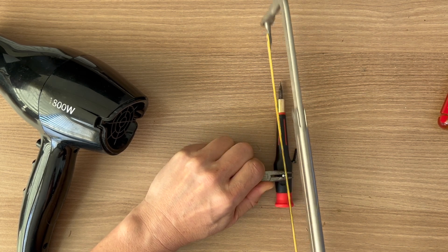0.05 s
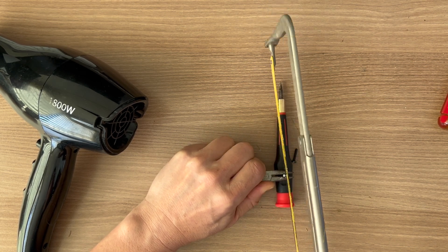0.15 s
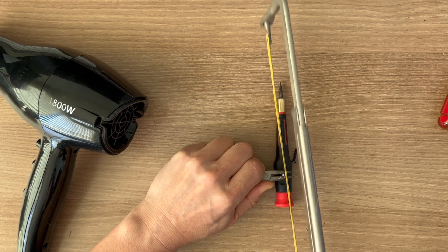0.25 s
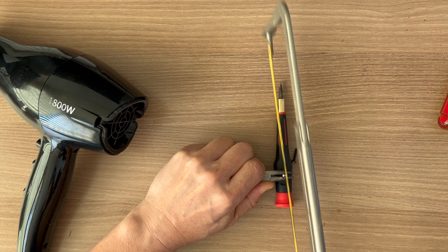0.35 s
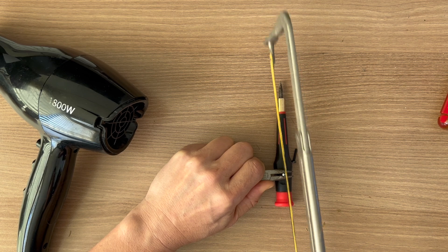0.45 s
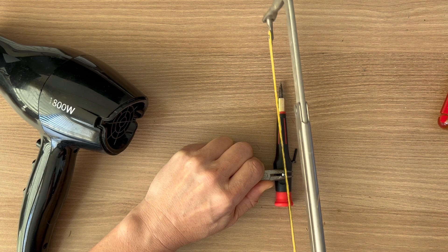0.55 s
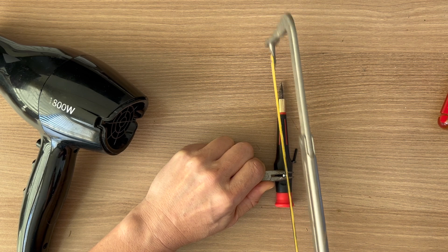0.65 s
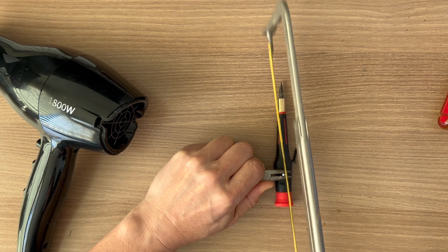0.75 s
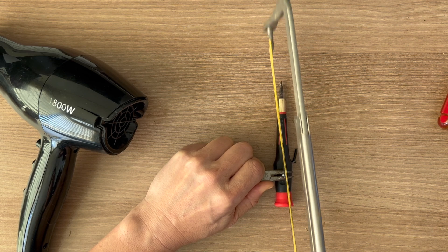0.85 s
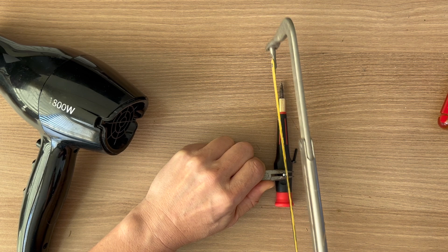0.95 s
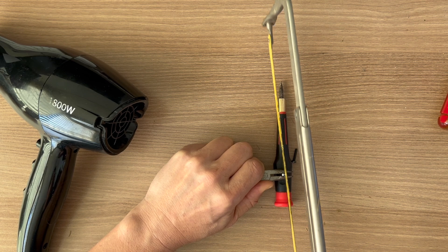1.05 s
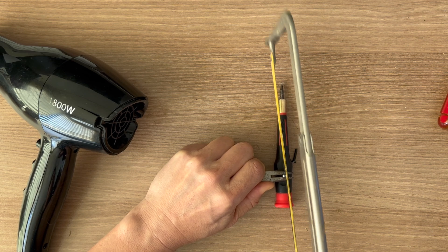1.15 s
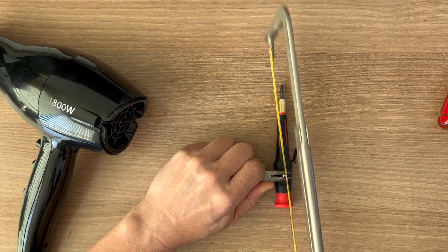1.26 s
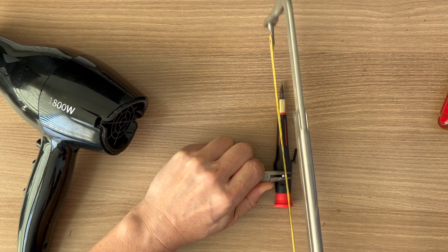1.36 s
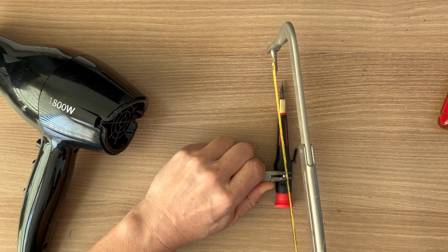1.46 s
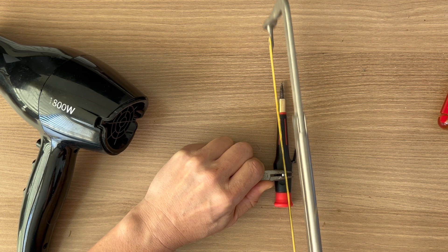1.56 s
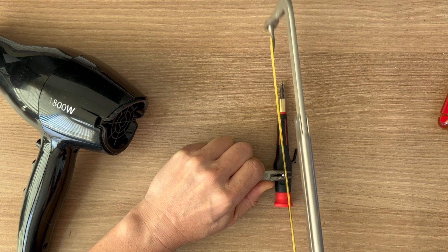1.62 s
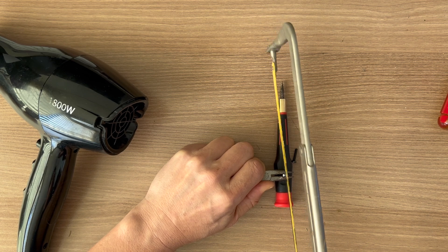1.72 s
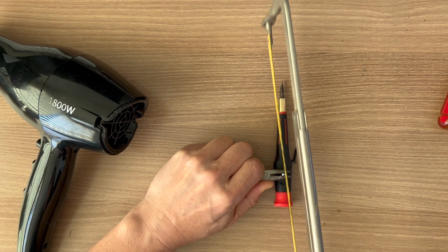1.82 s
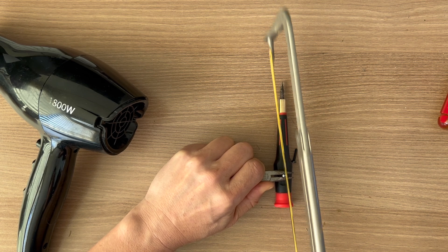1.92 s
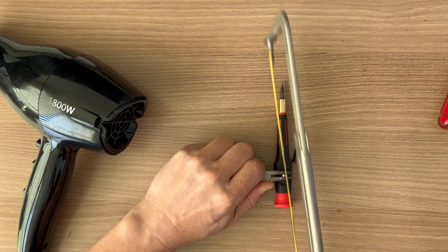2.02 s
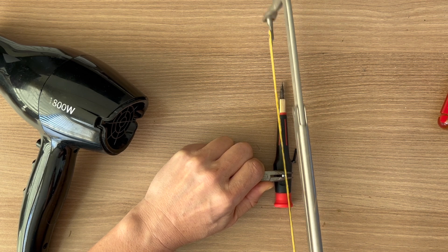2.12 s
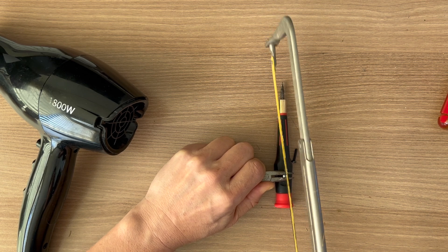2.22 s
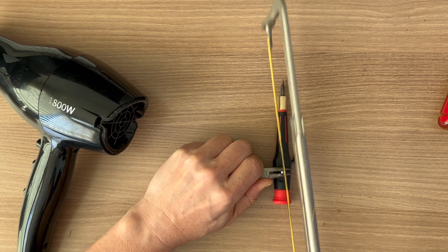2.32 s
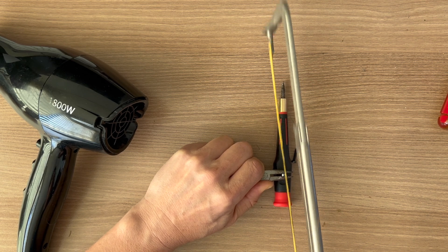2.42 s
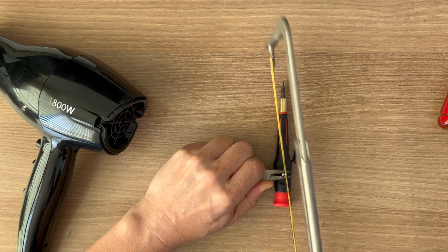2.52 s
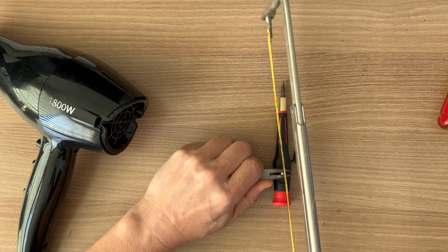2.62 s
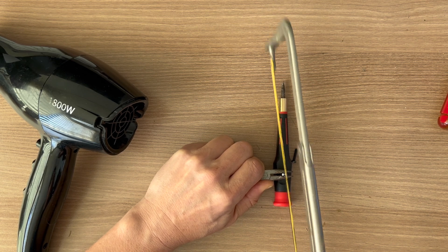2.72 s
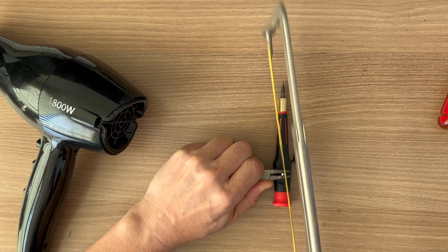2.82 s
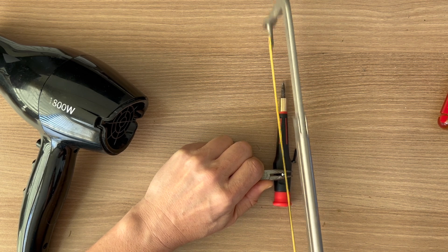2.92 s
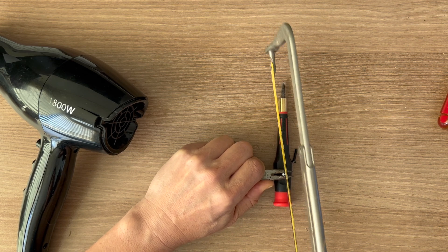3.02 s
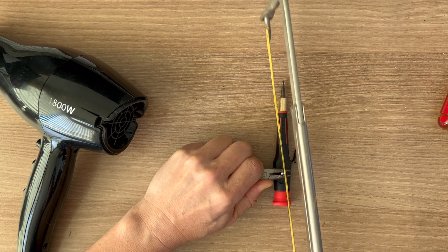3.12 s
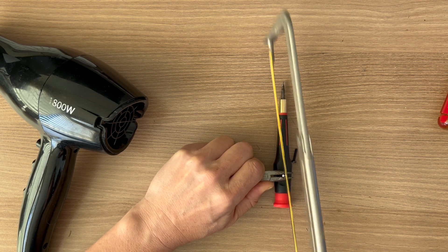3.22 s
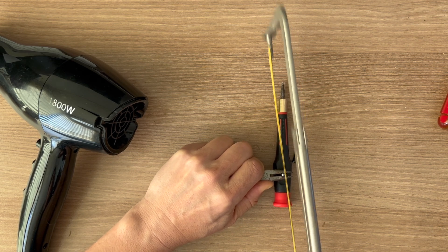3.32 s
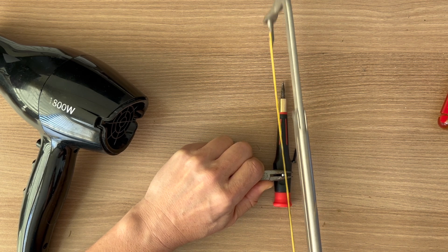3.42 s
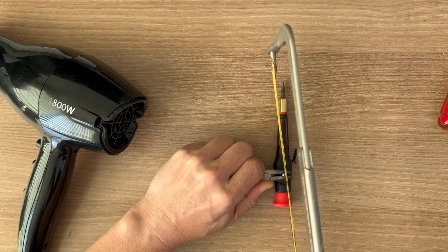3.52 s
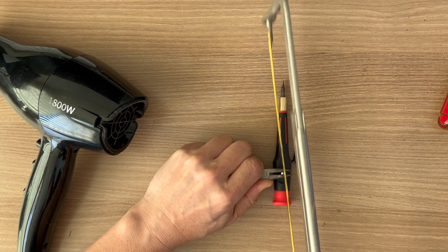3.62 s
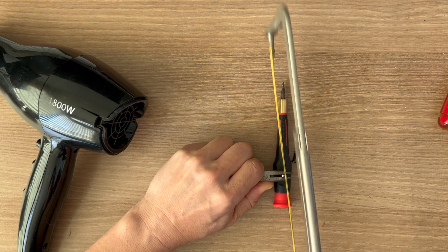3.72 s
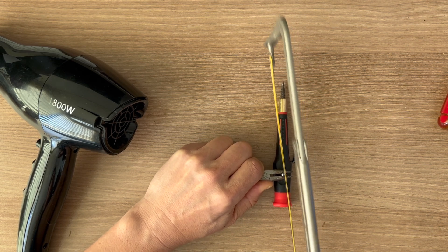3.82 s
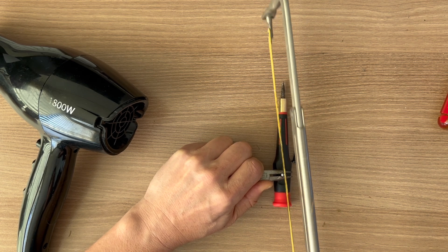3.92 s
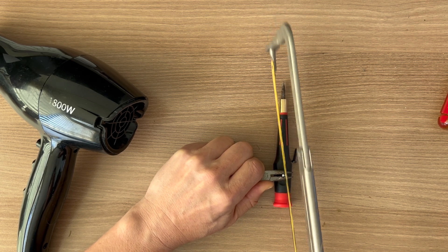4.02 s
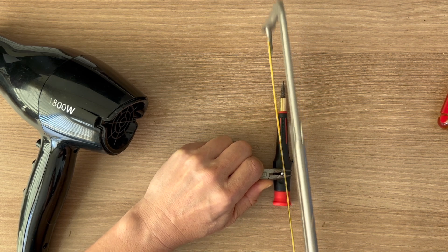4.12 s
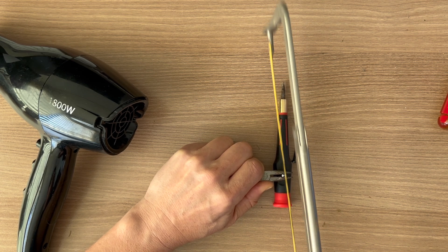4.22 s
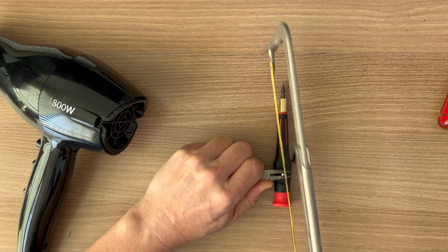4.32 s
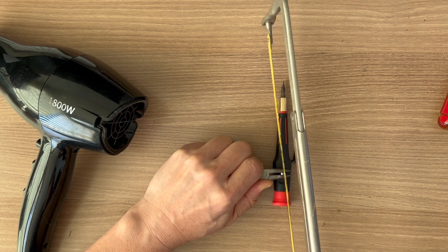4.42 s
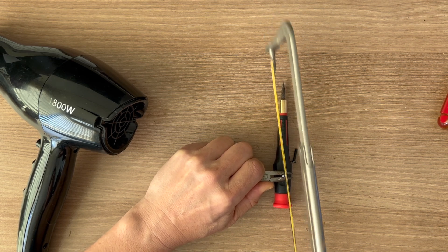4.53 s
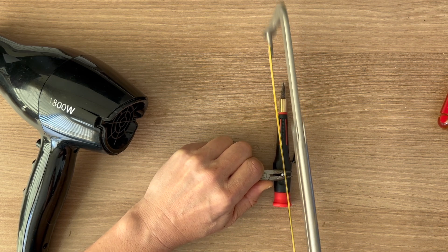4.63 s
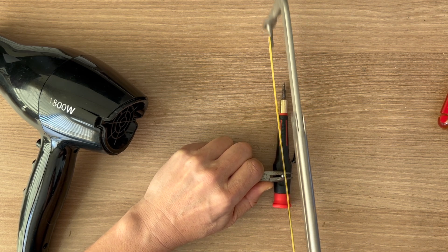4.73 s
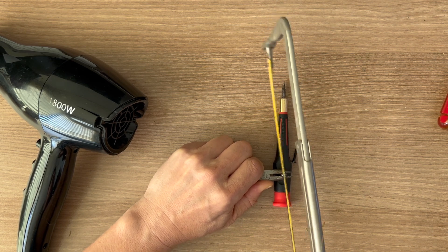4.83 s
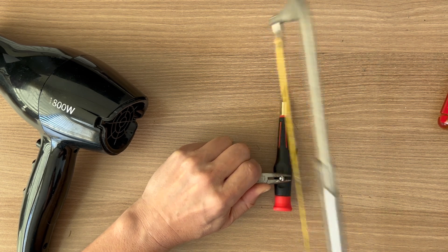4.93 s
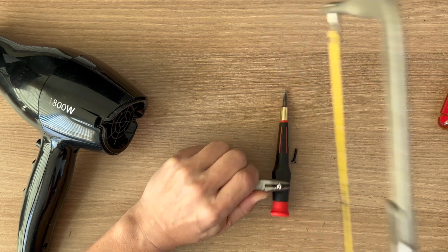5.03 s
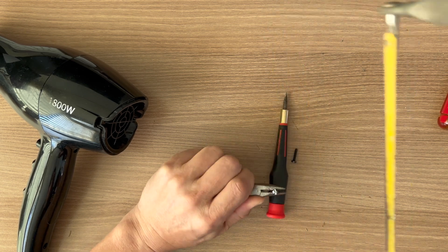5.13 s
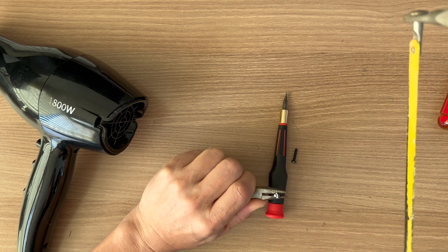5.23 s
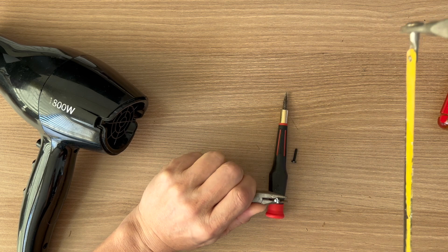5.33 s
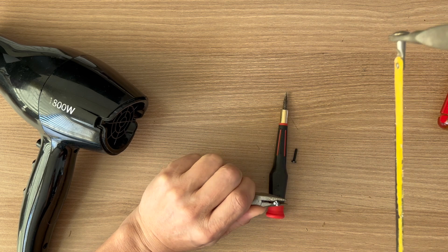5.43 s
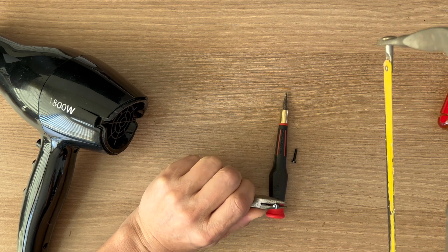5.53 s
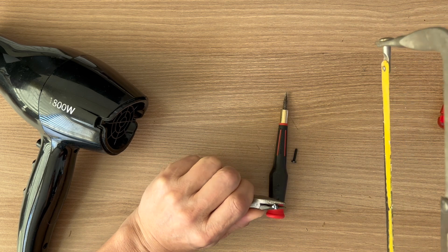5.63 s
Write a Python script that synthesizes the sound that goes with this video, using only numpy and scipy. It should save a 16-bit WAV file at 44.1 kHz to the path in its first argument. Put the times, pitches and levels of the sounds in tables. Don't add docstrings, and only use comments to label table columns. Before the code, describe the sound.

Sawing is already under way: short push and pull scrapes alternate rapidly, bright and metallic, with the thin frame resonating and the wooden bench rumbling underneath. Some teeth catch with sharp ticks. After nearly five seconds the strokes stop, the saw leaves the slot, and one bright wooden knock with duller rebounds ends the action. Then near silence with a barely audible distant whistle. Close stereo pickup, small dry room.

```python
import sys
import numpy as np
from scipy import signal
from scipy.fft import rfft, irfft, next_fast_len
from scipy.io import wavfile
from scipy.ndimage import uniform_filter1d

SR = 44100
rng = np.random.default_rng(int(sys.argv[2]) if len(sys.argv) > 2 else 0)


def ratio(d):
    e = np.asarray(d, float) / 20
    return 10 ** e


def master_out(mix):
    frames = np.transpose(np.atleast_2d(mix))
    ceiling = np.clip(frames, -1, 1)
    pcm = np.round(ceiling * 32767).astype(np.int16)
    wavfile.write(sys.argv[1], SR, pcm)


N = 249606
TIME = np.arange(N) / SR
SIZE = next_fast_len(N + SR)
HZ = np.fft.rfftfreq(SIZE, 1 / SR)

# (time [s], length [s], blade pressure [dB], lean on the bench [dB])
PULL_STROKES = [(0.06, 0.087, -39.5, 8), (0.322, 0.087, -37.5, 0), (0.591, 0.074, -36.5, 1.5),
                (0.845, 0.081, -39.5, 1), (1.101, 0.078, -37.5, -0.5), (1.362, 0.077, -35, 3.5),
                (1.623, 0.078, -33.5, -0.5), (1.878, 0.083, -36.5, 3), (2.132, 0.092, -38.5, 2.5),
                (2.397, 0.086, -36.5, 3.5), (2.656, 0.079, -34, -2.5), (2.915, 0.086, -35.5, 2),
                (3.179, 0.069, -33, 0), (3.433, 0.067, -33.5, 0.5), (3.694, 0.069, -34, 1),
                (3.952, 0.074, -33.5, 2), (4.205, 0.083, -36, 0), (4.461, 0.074, -36, 2.5),
                (4.721, 0.072, -41.5, 2.5)]
# (time [s], length [s], blade pressure [dB], lean on the bench [dB])
PUSH_STROKES = [(0.0, 0.021, -46.5, 12), (0.176, 0.085, -39, 7), (0.453, 0.066, -34, 2.7),
                (0.713, 0.066, -35, 3), (0.97, 0.079, -36.5, 5.5), (1.22, 0.077, -36, 5),
                (1.494, 0.063, -35.5, 5), (1.753, 0.069, -34.5, 3.5), (2.002, 0.078, -33.5, 3.5),
                (2.28, 0.066, -37, 6.5), (2.524, 0.081, -33.5, 1.5), (2.786, 0.075, -31.5, 4),
                (3.038, 0.078, -32.5, 0.5), (3.292, 0.088, -36, 5), (3.553, 0.084, -33.5, 3),
                (3.815, 0.075, -34.5, 2), (4.074, 0.071, -32.5, 2.5), (4.331, 0.074, -34.5, 0.5),
                (4.584, 0.079, -31.5, -1)]
# (lead-in [s], run-out [s], skew [power], sharpness [power], fastest teeth [1/s])
PULL_SHAPE, PUSH_SHAPE = (.015, .03, .8, 1.3, 420), (.02, .025, 1.1, 1.3, 450)
USUAL_DB = -35
# (at usual pressure [dB], lost per dB of extra pressure [dB])
PULL_FRAME, PULL_WHINE = (4.7, 0.21), (-2.7, 0.42)
PUSH_FRAME, PUSH_WHINE = (2.46, 0.38), (0.3, 0.49)
# (time [s], length [s], pressure [dB])
DRAG = (4.787, 0.055, -44.5)
DRAG_OVER_DB = (-11, -32, 4.5)
PART_RESPONSE = [(1.01, 1.5), (0.92, 1.33), (1.2, 0.77), (0.75, 1.41)]
# (time [s], level [dB])
SNAGS = [(0.3317, -19), (0.4614, -23.5), (0.9702, -27.5), (1.2292, -24), (1.6432, -28), (1.7555, -23),
         (1.7689, -16.5), (2.0074, -24), (2.1585, -22), (2.2912, -17), (2.5272, -28), (2.5412, -21),
         (2.6614, -35), (2.7946, -20), (3.0445, -26), (3.1887, -23), (3.2126, -17), (3.2994, -21.5),
         (3.4526, -23), (3.5534, -23.5), (3.9604, -26), (3.9899, -17), (4.0732, -28), (4.4937, -23),
         (4.575, -25), (4.5925, -19)]
SNAG_DB = 9.5
BITE_S, BITE_DB, BITE_SPREAD_DB = .004, 12.5, 2.5

BLADE_HZ = [3910, 4024, 4368, 5020, 5178, 5875, 6110, 6520, 6828, 7555, 7838, 8085, 8925, 13113]
# (width [Hz], level [dB], left over right [dB], left lead [rad])
BLADE_MODES = [(30, -12, -1, 5.5), (24, -8.5, 12.5, 1.4), (24, -12, 4, -6.5), (70, -13, 15, 2.5),
               (50, -11, -2.5, 0.7), (39.6, -26, 39, 1.5), (24, -17.5, 5, 7.5), (75.6, -13.5, 4, 0.5),
               (45.3, -12.5, 13, 0.47), (48, -8.5, -5, -5), (69.4, -17.5, 10.5, -2.2), (50, -24, 25, -2.2),
               (81, -28.5, 16, 4), (60, -8, 2, 9.5)]
# (frequency [Hz], level [dB])
BLADE_GRIT = [(1500, -88.5), (3000, -22.5), (3800, -60), (5000, -14.5), (7700, -30.5), (8300, -39),
              (9700, -25), (11400, -20.5), (12000, -70), (13700, -17), (14400, -51), (14900, -41),
              (15600, -57)]
FRAME_HZ = [545, 566, 620, 690, 760, 881, 935, 1031, 1345, 1420, 1510, 2045]
# (width [Hz], level [dB], left over right [dB], left lead [rad])
FRAME_MODES = [(15.7, -25, 25, -11), (28.6, 1.5, 9.5, 1.43), (46.7, 1, -5.5, -1.7), (35, -36.5, 51, 2.5),
               (25, -15, 1, -0.7), (34, -2.5, -0.5, -1.5), (22, -8.5, 12, -1.1), (22, -3, 7, -0.5),
               (40, 0.5, 6, 0.2), (59, -12, -8, 0.38), (29.7, -13.5, 30, 2), (92, -14, 13, 1)]
# (frequency [Hz], level [dB])
FRAME_GRIT = [(60, -14), (420, -43.5), (600, -7), (1500, -13), (2200, -15), (2800, -28), (5000, -34.5)]
WHINE_HZ = [3326, 3409, 3550, 3604]
# (width [Hz], level [dB], left over right [dB], left lead [rad])
WHINE_MODES = [(14.6, -12.5, -6, .5), (19, -6.5, -3.5, .6), (49.7, -13.5, -2, 0.67), (18, 1.2, -1, 0.35)]
TOP_HZ = [276, 336, 380]
# (width [Hz], level [dB], left over right [dB], left lead [rad])
TOP_MODES = [(13.7, 4, -11, -0.099), (21.5, -15, 11, -0.14), (35, -6, 7, 0.02)]

# (time [s], level [dB])
BENCH_FORCE = [(0.0, -42), (0.33, -40), (0.85, -43), (0.99, -40), (1.1, -45), (1.18, -42.5), (2.05, -42.5),
               (2.28, -43), (2.33, -45), (2.77, -39), (2.84, -42.5), (4.35, -40.5), (4.36, -42),
               (4.81, -42.5), (4.96, -68), (5.06, -41), (5.22, -58), (5.66, -61.5)]
LEGS_HZ = [62, 132, 180]
# (width [Hz], level [dB], left over right [dB], left lead [rad])
LEGS_MODES = [(16, 0, 1, .3), (22, -4, .8, .35), (40, -21, -.5, .3)]
SWAY_DB, SWAY_LAG_S = 1, .01

# (frequency [Hz], level [dB])
AIR_COLOUR = [(30, -7), (127, -19), (860, -13.5), (1400, -13), (2700, -13), (3700, -19), (9000, -21.5),
              (11000, -26.5), (13500, -21), (16000, -21)]
# (frequency [Hz], likeness [-1..1])
AIR_SAME = [(60, 0.054), (180, -0.23), (550, -0.43), (1650, -0.66), (4970, 0.52), (15000, -0.76)]
AIR_DB = -50
# (frequency [Hz], t60 [s])
ROOM_DECAY = [(100, 0.38), (500, 0.28), (2000, 0.25), (6000, 0.22), (14000, 0.22)]
ROOM_TURNS_PER_S = 1.7

FLICK_AT_S, FLICK_RISE_S, FLICK_FADE_S, FLICK_DB = 4.794, 0.3, 0.01, -32.5
# (width [Hz], level [dB], left over right [dB], left lead [rad])
FLICK_HZ = [4350, 7900, 12700, 14000]
FLICK_MODES = [(150, -8, 2, 0), (500, 4, 0, -1.1), (900, -7, 0, 0), (1500, -7, 0, 0)]

# (time [s], level [dB], brightness [dB], length [s])
KNOCKS = [
    (4.859, -14.5, -44, 0.005),
    (5.005, -21, -44, 0.005),
    (5.04, -3, 2, 0.0038),
    (5.042, -7.5, -20, 0.005),
    (5.052, -26, -20, 0.013),
    (5.064, -26, -18, 0.0074),
    (5.0905, -10, -36, 0.007),
    (5.105, -19, -20, 0.012),
    (5.124, -32, -23, 0.004),
    (5.162, -50, -23, 0.0066),
]
WOOD_HZ = [150, 340, 575, 1000, 1420, 2930]
# (width [Hz], level [dB], left over right [dB], left lead [rad])
WOOD_MODES = [(70, -8, .3, 0), (150, -1, 0, 0), (75, 2, 0, -.4), (250, -7, 0, .2), (200, -6, 1, .3),
              (350, -15, 0, .9)]
# (frequency [Hz], level [dB])
THUD = [(60, -25), (200, -3.5), (600, -2.5), (1500, -12), (2400, -14.5), (3600, -18.5), (5000, -40),
        (9000, -60)]
# (frequency [Hz], level [dB])
CRACK = [(1500, -60), (4000, 0), (6000, 26), (8000, -5), (11000, 3), (14000, 16), (16000, -31)]
# (time [s], level [dB])
WHISTLE = [
    (4.9, -92),
    (5.3, -72),
    (5.45, -63),
    (5.66, -58),
]

# (frequency [Hz], left lead [rad])
PORT_LEAD = [(2000, 0), (4500, .9), (6200, -1), (8000, -1.2), (9200, -3.14), (10600, -3.3), (12200, -6.28),
             (14400, -6.28), (15500, -9.2)]
# (frequency [Hz], level [dB])
SUM_COLOUR = [(20, -27), (52, 0), (8900, 0), (9300, -13), (10500, -13), (11300, -3), (14900, 0),
              (15400, -10), (15800, -14), (16400, -30), (16500, -70)]
# (frequency [Hz], level [dB])
DIFFERENCE_COLOUR = [(20, -30), (60, -5), (400, -4), (600, 0), (11600, 0), (12000, -15), (14300, -15),
                     (14700, -3), (15700, -4), (15900, -70)]


def evened(x):
    return x / np.sqrt(np.mean(abs(x) ** 2) + 1e-20)


def read(points, hz):
    f, value = np.transpose(points)
    return np.interp(np.log(hz + 1), np.log(f + 1), value)


def modes(pitches, rows):
    out = np.zeros((2, len(HZ)), complex)
    for hz, (width, db, pan_db, lead) in zip(pitches, rows):
        damping = 1j * HZ * abs(width)
        peak = damping / (hz ** 2 - HZ ** 2 + damping)
        left, right = ratio(pan_db / 2) * np.exp(1j * lead), ratio(-pan_db / 2)
        out += ratio(db) * peak * np.array([[left], [right]])
    return out


def broad(points):
    gain = np.log(ratio(read(points, HZ)))
    mirrored = np.r_[gain, gain[-2:0:-1]]
    causal = np.exp(np.conj(signal.hilbert(mirrored))[:len(HZ)])
    return causal * np.array([np.exp(1j * read(PORT_LEAD, HZ)), np.ones(len(HZ))])


def ring(force, response, scrape=None, colour=0):
    out = rfft(force, SIZE) * response
    if scrape is not None:
        out = out + rfft(scrape, SIZE) * colour
    return irfft(out, SIZE)[:, :N] / np.sqrt(np.mean(abs(response) ** 2 + abs(colour) ** 2))


def strokes():
    rows = [(*DRAG, DRAG_OVER_DB, PUSH_SHAPE)]
    pulls = PULL_STROKES, PULL_FRAME, PULL_WHINE, PULL_SHAPE
    pushes = PUSH_STROKES, PUSH_FRAME, PUSH_WHINE, PUSH_SHAPE
    for table, frame, whine, shape in (pulls, pushes):
        for s, length, db, lean_db in table:
            frame_db = frame[0] - frame[1] * (db - USUAL_DB)
            whine_db = whine[0] - whine[1] * (db - USUAL_DB)
            rows.append((s, length, db, (frame_db, lean_db, whine_db), shape))
    return rows


def motion():
    rate, press = np.zeros(N), np.zeros((4, N))
    late, sharper = np.transpose(PART_RESPONSE)[:, :, None]
    for s, length, db, over_db, (lead, out, skew, sharp, fastest) in strokes():
        at = slice(max(round((s - lead) * SR), 0), round((s + length + out) * SR))
        way = np.clip((TIME[at] - s + lead) / (length + lead + out), 0, 1)
        speed = np.sin(np.pi * way ** (skew * late)).clip(0)
        teeth_per_s = fastest * speed[0] ** .15 * (1 - .4 * way)
        rate[at] = np.maximum(rate[at], teeth_per_s)
        press[:, at] += ratio(db + np.r_[0, over_db])[:, None] * speed ** (sharp * sharper)
    return rate, press


def catches():
    out = np.zeros(N)
    both_ways = PULL_STROKES + PUSH_STROKES
    for (s, _, db, _), chance in zip(both_ways, rng.standard_normal(len(both_ways))):
        out[round((s + BITE_S) * SR)] = ratio(db + BITE_DB + BITE_SPREAD_DB * chance)
    for s, db in SNAGS:
        out[round(s * SR)] = ratio(db + SNAG_DB)
    return out


def saw():
    rate, press = motion()
    on_blade, on_frame, on_top, on_whine = press
    wobble = evened(uniform_filter1d(rng.standard_normal(N), 150))
    passed = np.cumsum(rate * np.clip(1 + .08 * wobble, 0, 3)) / SR
    tooth_db = 2.4 * rng.exponential(1, N).clip(0, 3)
    teeth = np.diff(np.floor(passed), prepend=0) * ratio(tooth_db)
    puffs = signal.lfilter([1], [1, -np.exp(-1 / (0.0017 * SR))], teeth)
    rough = ratio(0.98 * evened(uniform_filter1d(rng.standard_normal(N), 500)))
    grit, dust = rough * (2.54 + evened(puffs)) * rng.standard_normal((2, N))
    clicks, snags = rough * evened(teeth), catches()
    shake = 0.35 * clicks + evened(grit)
    scrape = 0.32 * clicks + evened(dust)

    blade = ring(shake * on_blade + snags, modes(BLADE_HZ, BLADE_MODES),
                 scrape * on_blade + 0.98 * snags, broad(BLADE_GRIT))
    frame = ring(shake * on_frame + 0.15 * snags, modes(FRAME_HZ, FRAME_MODES),
                 scrape * on_frame + 0.87 * snags, broad(FRAME_GRIT))
    whine = ring(shake * on_whine + .7 * snags, modes(WHINE_HZ, WHINE_MODES))
    purr = ratio(-6.5) * np.cos(2 * np.pi * passed) * rough * on_top
    top = ring(shake * on_top, modes(TOP_HZ, TOP_MODES))
    return ratio(2.0) * blade + ratio(0.5) * frame + ratio(-6) * top + purr + ratio(4.0) * whine


def shifting(x, patchy_db):
    z = signal.stft(x, nperseg=512)[2]
    patches = rng.standard_normal(z.shape[:0:-1]).T
    patches = uniform_filter1d(patches, size=5, axis=0)
    patches = evened(uniform_filter1d(patches, size=7, axis=1))
    return signal.istft(z * ratio(patchy_db * patches), nperseg=512)[1][:, :N]


def shudder():
    s, db = np.transpose(BENCH_FORCE)
    push_times = [row[0] for row in PUSH_STROKES]
    turns = np.interp(TIME - SWAY_LAG_S, push_times, np.arange(len(push_times)))
    sway_db = SWAY_DB * np.sin(2 * np.pi * turns)
    rumble = evened(ring(rng.standard_normal(N), modes(LEGS_HZ, LEGS_MODES)))
    return ratio(np.interp(TIME, s, db) + sway_db + 3.5) * rumble


def air():
    a, b = rfft(rng.standard_normal((2, SIZE)))
    same = np.clip(read(AIR_SAME, HZ), -1, 1)
    right = same * a + np.sqrt(1 - same ** 2) * b
    pair = np.array([a, right]) * ratio(read(AIR_COLOUR, HZ))
    return ratio(AIR_DB + 1.0) * evened(irfft(pair, SIZE)[:, :N])


def room(x):
    taps = np.zeros((6, SR // 2))
    count = (SR // 2 - 201) // 20
    at = np.arange(200, SR // 2 - 20, 20) + rng.integers(0, 20, (6, count))
    np.put_along_axis(taps, at, rng.choice([-1., 1.], at.shape), 1)
    hz, t, z = signal.stft(taps, SR, nperseg=256)
    decay = ratio(-60 * t / read(ROOM_DECAY, hz)[:, None])
    tail = signal.istft(z * decay, SR, nperseg=256)[1]
    turn = np.pi * (ROOM_TURNS_PER_S * TIME + np.arange(3)[:, None] / 3)
    fed = rfft(x.mean(0) * np.cos(turn) ** 2 * np.sqrt(8 / 9), SIZE)
    wet = fed[:, None] * rfft(tail / np.linalg.norm(tail[0]), SIZE).reshape(3, 2, -1)
    return irfft(wet.sum(0), SIZE)[:, :N]


def flick():
    t = (TIME - FLICK_AT_S).clip(0)
    shape = (1 - np.exp(-t / FLICK_RISE_S)) * np.exp(-t / FLICK_FADE_S)
    scrape = shape / shape.max() * rng.standard_normal(N)
    return ratio(FLICK_DB) * ring(scrape, modes(FLICK_HZ, FLICK_MODES))


def knocks():
    blow, crack, t = np.zeros(N), np.zeros(N), np.arange(2000) / SR
    noises = rng.standard_normal((len(KNOCKS), len(t)))
    for (s, db, bright_db, length), noise in zip(KNOCKS, noises):
        at = slice(round(s * SR), round(s * SR) + len(t))
        blow[at] += ratio(db) * noise * np.exp(-t / abs(length))
        crack[at] += ratio(db + bright_db) * noise * np.exp(-t / 0.00059)
    scattered = blow * rng.choice([-1, 1], N)
    wood = ring(blow, modes(WOOD_HZ, WOOD_MODES), scattered, broad(THUD))
    whine = ring(blow, modes(WHINE_HZ, WHINE_MODES))
    return ratio(-6.5) * wood + ratio(-13) * ring(crack, broad(CRACK)) + ratio(-43) * whine


def whistle():
    s, db = np.transpose(WHISTLE)
    tone = ring(rng.standard_normal(N), modes([1340], [(27.6, 0, .0, .0)]))
    return ratio(np.interp(TIME, s, db)) * tone


def gated(pair):
    above_hz, open_share = 8800, .14
    under_other_db, under_all_db, least_db, chance_db = 11, 40, -88, 4
    hz, _, z = signal.stft(pair, SR, nperseg=2048)
    power = np.add.reduceat(abs(z) ** 2, np.arange(0, len(hz), 16), axis=1)
    whole = power.sum((0, 1))
    mask = np.maximum(power[::-1] * ratio(-2 * under_other_db), whole * ratio(-2 * under_all_db))
    masked = power < mask * ratio(2 * chance_db * rng.standard_normal(power.shape))
    weak = masked | (power < ratio(2 * least_db))
    closed = rng.random(power.shape[2]) > open_share
    weak &= closed | (power < whole * ratio(-2 * 54))
    weak = np.repeat(weak, 16, axis=1)[:, :len(hz)] & (hz > above_hz)[:, None]
    return signal.istft(z * ~weak, SR, nperseg=2048)[1][:, :N]


def scene():
    cut, hits = shifting(saw(), patchy_db=1.5), knocks()
    echoes = room(ratio(-4.5) * cut + ratio(-3.5) * hits)
    return cut + hits + echoes + shudder() + air() + whistle() + flick()


def roll_off(x):
    return signal.sosfilt(signal.butter(12, 16460, fs=SR, output="sos"), x)


def record(dry):
    left, right = rfft(dry, SIZE)
    total = (left + right) / 2 * ratio(read(SUM_COLOUR, HZ))
    difference = (left - right) / 2 * ratio(read(DIFFERENCE_COLOUR, HZ))
    mid, side = gated(irfft(np.array([total, difference]), SIZE)[:, :N])
    return roll_off(np.array([mid + side, mid - side]))


dry = scene()
out = record(dry)
master_out(out)
```